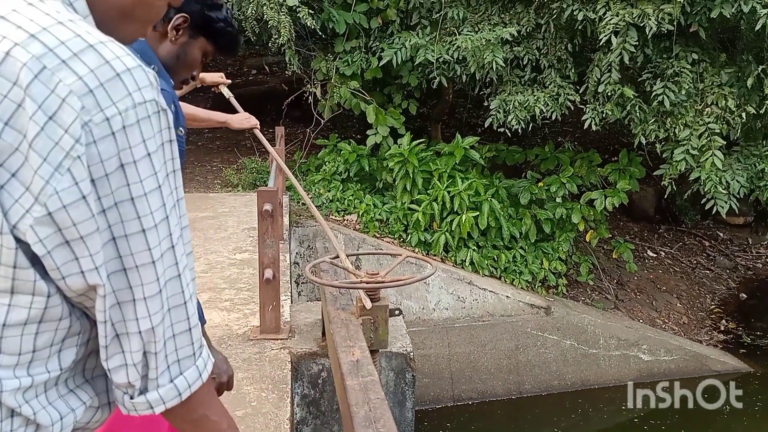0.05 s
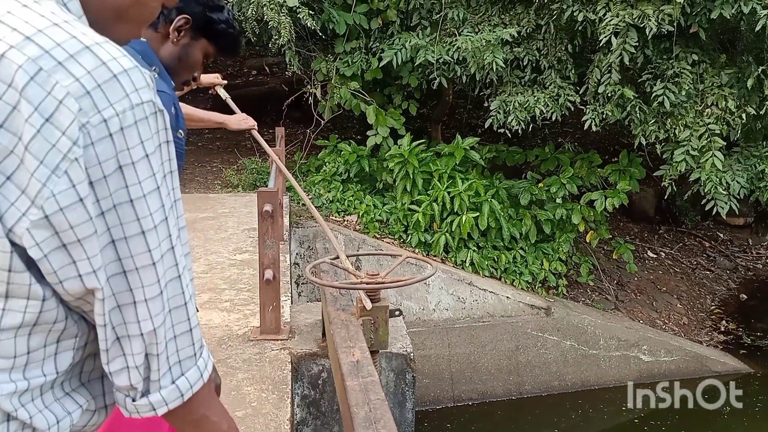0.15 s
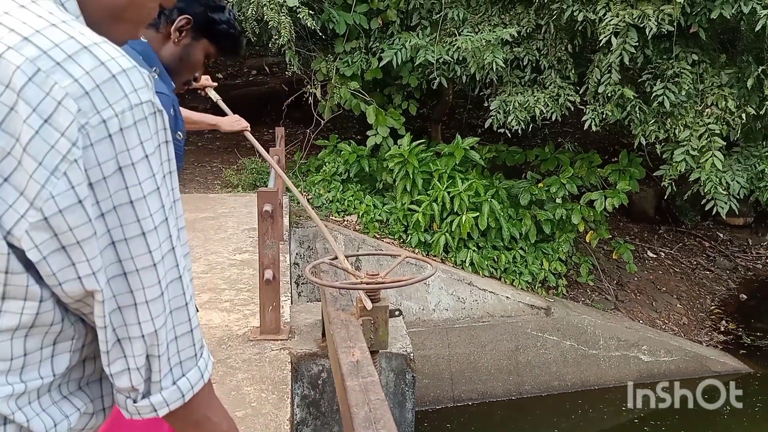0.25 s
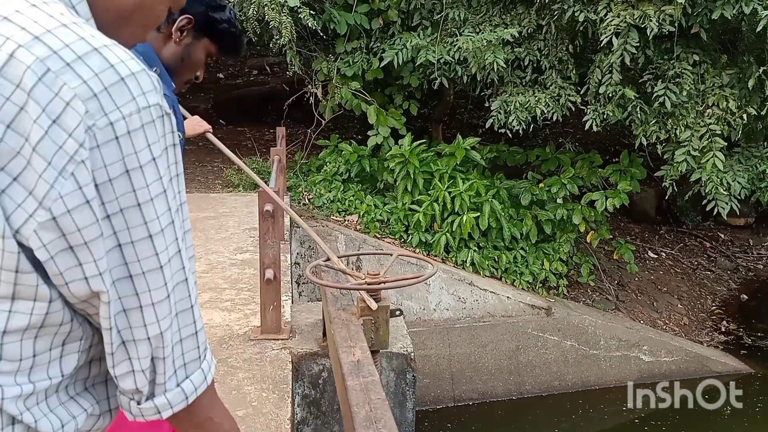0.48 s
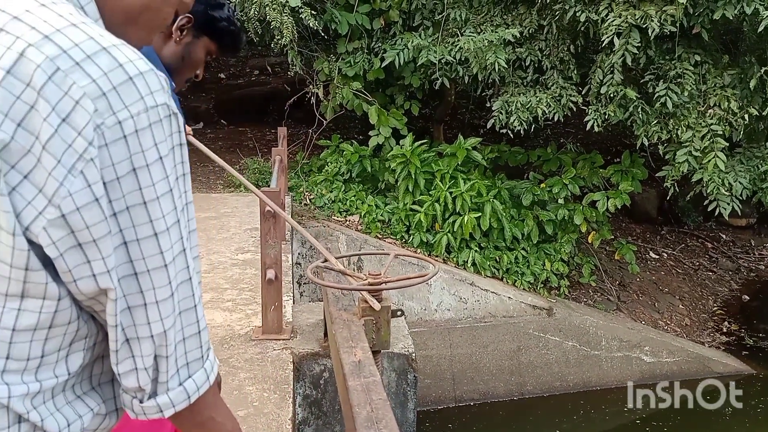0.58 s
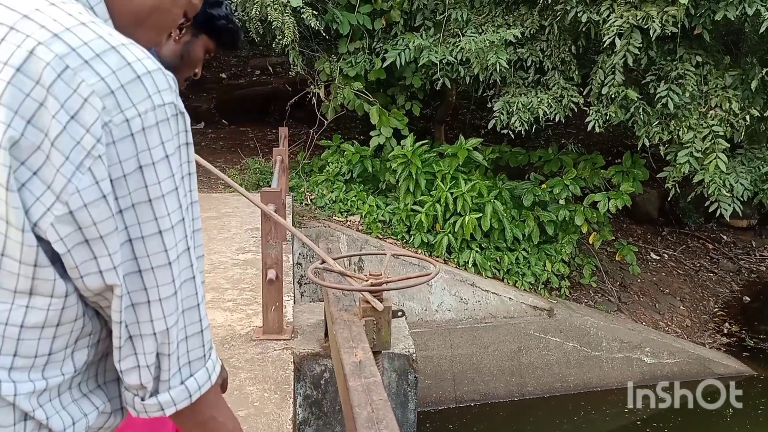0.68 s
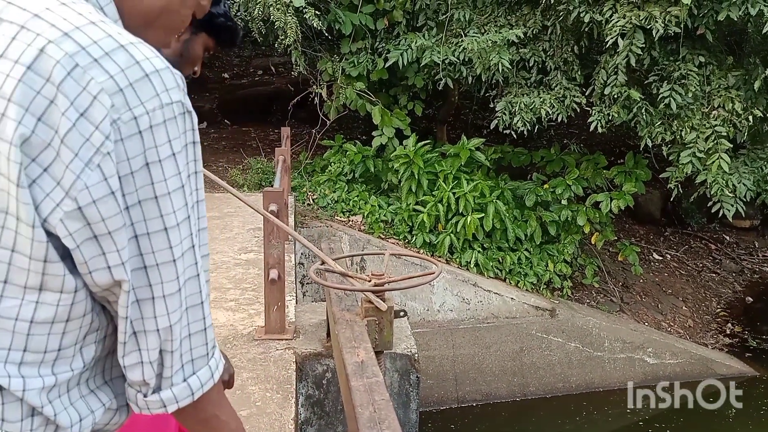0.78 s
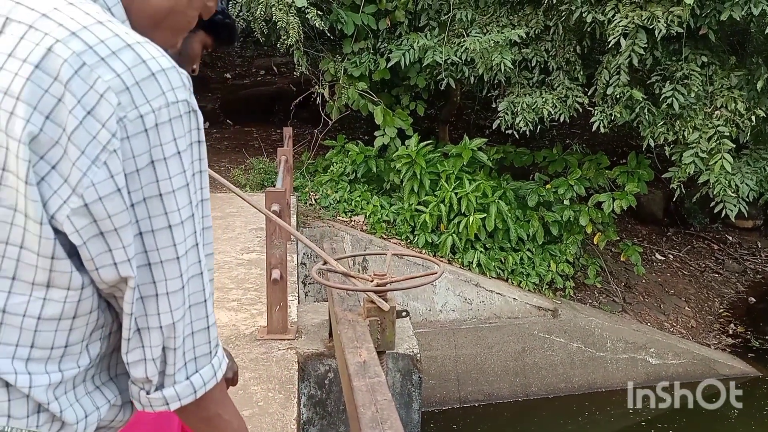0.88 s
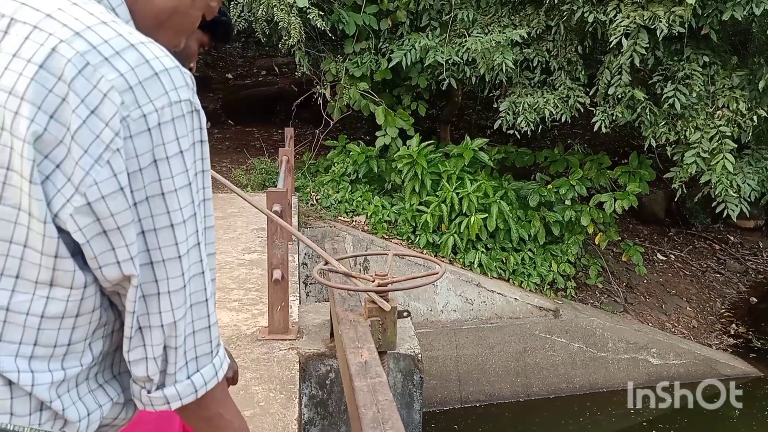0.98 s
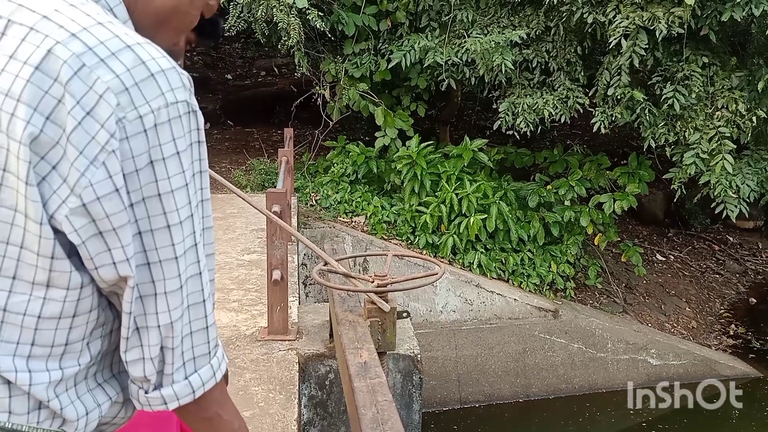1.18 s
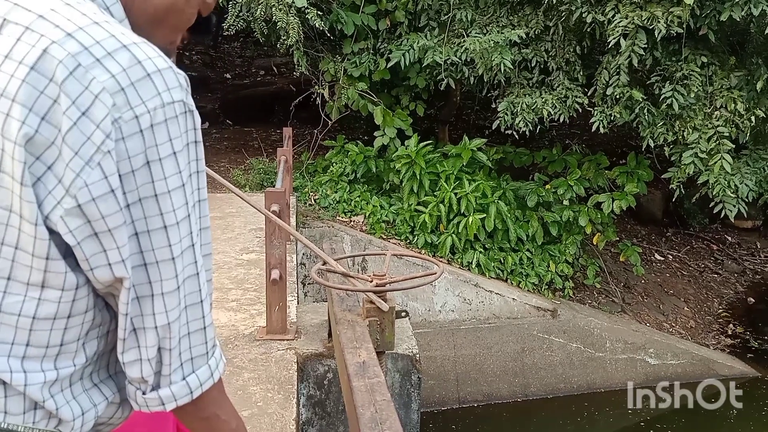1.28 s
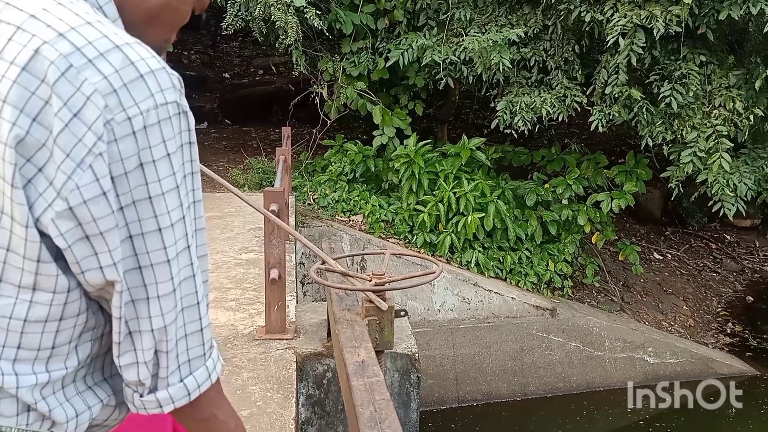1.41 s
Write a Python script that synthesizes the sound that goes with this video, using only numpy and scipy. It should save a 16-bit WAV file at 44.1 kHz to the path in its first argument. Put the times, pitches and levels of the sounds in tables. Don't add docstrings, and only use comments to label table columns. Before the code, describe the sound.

A rusty iron handwheel is forced round with a bar, knocking, creaking and ringing in jolts outdoors

```python
import sys
import numpy as np
from scipy import signal
from scipy.fft import rfft, irfft, next_fast_len
from scipy.io import wavfile
from scipy.ndimage import uniform_filter1d, map_coordinates

SR = 44100
rng = np.random.default_rng(int(sys.argv[2]) if len(sys.argv) > 2 else 0)


def gain_from_db(level_db):
    decades = np.asarray(level_db, float) / 20
    return 10 ** decades


def materialize(psi):
    bounded = np.clip(np.atleast_2d(psi).T, -1, 1)
    quanta = np.round(bounded * 32767).astype(np.int16)
    wavfile.write(sys.argv[1], SR, quanta)


N = 63945


def unit(x):
    return x / np.sqrt(np.mean(x ** 2) + 1e-20)


def along(points, hz):
    point_hz, value = np.transpose(points)
    return np.interp(np.log(hz + 1), np.log(point_hz + 1), value)


def wobble(rate_hz):
    knots = rng.standard_normal(int(N * rate_hz / SR) + 4)
    return map_coordinates(knots, [np.arange(N) * rate_hz / SR])


def filtered(x, response):
    size = next_fast_len(x.shape[-1] + SR // 2)
    spectrum = rfft(x, size) * response(np.fft.rfftfreq(size, 1 / SR))
    return irfft(spectrum, size)[..., :x.shape[-1]]


def band(low_hz, high_hz):
    def response(f):
        high_pass = (1j * f / low_hz / (1 + 1j * f / low_hz)) ** 4
        return high_pass / (1 - (f / high_hz) ** 2 + 1.2j * f / high_hz) ** 3
    return response


def shares(alike, hz):
    turn = np.arccos(np.clip(along(alike, hz), -1, 1)) / 2
    return np.array([np.cos(turn), np.sin(turn)])


def left_right(pair):
    mid, side = pair
    return np.array([mid + side, mid - side])


def add_at(out, start_s, sound):
    out[:, round(start_s * SR):][:, :sound.shape[1]] += sound


# (pitch_hz, level_db per Hz)
HISS_COLOUR = [(40, 1), (130, -4), (350, -12), (1200, -6.5), (4000, -18), (6600, -9), (7900, -29),
               (15300, -41)]
# (pitch_hz, likeness 0-1)
HISS_LIKENESS = [(100, 0.82), (1000, 0.28), (3000, 0.059), (8000, 0.1)]


def hiss():
    hiss_db, trickle_db = -70.5, -73.5
    trickle_hz, trickle_width_hz = 2540, 700
    wide, trickle = rng.standard_normal((2, 2, N))
    wide = unit(filtered(wide, lambda hz: gain_from_db(along(HISS_COLOUR, hz)) * shares(HISS_LIKENESS, hz)))
    lump = lambda hz: np.exp(-((hz - trickle_hz) / trickle_width_hz) ** 2)
    trickle = unit(filtered(trickle, lambda hz: lump(hz) * shares(HISS_LIKENESS, hz)))
    wide = wide * gain_from_db(hiss_db + 1.1 * wobble(18))
    trickle = trickle * gain_from_db(trickle_db + 1.1 * wobble(14))
    return left_right(wide + trickle)


# (pitch_hz, level_db, fade_s to -60 dB)
BEAM_TONES = [(144.6, 2, 0.63), (180.8, -7.5, 0.51), (230.6, -5, 0.34), (285, -5.5, 0.3),
              (326.9, -10.5, 0.27), (388, -6, 0.28)]
# (start_s, upper_hum_db, lower_hum_db)
PUSHES = [(-.3, -37, -54), (0.238, -40, -41), (.3, -42.5, -48), (.37, -45, -54), (0.481, -42.5, -46),
          (0.529, -40.5, -38), (.575, -37, -42), (0.62, -47, -32), (.66, -37, -45), (0.71, -34.5, -40),
          (.79, -48.5, -43), (.85, -44, -47), (1.03, -56, -66)]


def beam():
    rise_s, grip_s = .028, .022
    unsteady_db = 2
    t, out = np.arange(N) / SR, np.zeros(N)
    ends = [row[0] for row in PUSHES[1:]] + [N]
    for (start_s, upper_db, lower_db), end_s in zip(PUSHES, ends):
        since = np.maximum(t - start_s, 0)
        gripped = np.exp(-np.maximum(t - end_s, 0) / grip_s)
        shape = (1 - np.exp(-since / rise_s)) ** 2 * gripped
        tones = [(hz, db + upper_db, fade_s) for hz, db, fade_s in BEAM_TONES]
        tones.append((92.4, lower_db, 0.5))
        tones.append((50, lower_db - 15, .3))
        for hz, db, fade_s in tones:
            level = gain_from_db(db - 60 * since / fade_s + unsteady_db * wobble(14.96))
            out += shape * level * np.sin(2 * np.pi * hz * since + rng.uniform(0, 2 * np.pi))
    return out


# (start_s, length_s, pitch_hz, level_db)
HOOT_CALLS = [(0.032, 0.022, 2490, -59.5), (0.175, 0.059, 870, -67.5), (0.346, 0.022, 1180, -56.5),
              (0.374, 0.021, 1144, -70.5), (0.445, 0.06, 1195, -63), (0.934, 0.02, 1170, -64),
              (0.963, 0.022, 1170, -57), (1.018, 0.02, 1150, -55), (1.036, 0.022, 1250, -57),
              (1.051, 0.024, 1190, -56.5), (1.08, 0.023, 1190, -69), (1.173, 0.015, 1150, -54),
              (1.267, 0.058, 1210, -63.5), (1.319, 0.016, 1180, -64), (1.335, .018, 1210, -68),
              (1.372, .02, 1240, -74), (1.393, 0.038, 1190, -64.5), (1.429, 0.019, 1210, -57.5)]


def bird():
    edge_s, waver_hz, left_db = 0.0057, 25.7, 5.5
    t, out = np.arange(N) / SR, np.zeros(N)
    waver = 2 * np.pi * np.cumsum(waver_hz * wobble(60)) / SR
    for start_s, length_s, hz, db in HOOT_CALLS:
        shape = np.clip(np.minimum(t - start_s, start_s + length_s - t) / edge_s, 0, 1)
        out += gain_from_db(db - 2.5) * shape * np.sin(2 * np.pi * hz * t + waver)
    return out * gain_from_db(2.5 * wobble(90)) * gain_from_db([[left_db], [-left_db]])


# (start_s, pitch_hz, level_db, fade_s to -60 dB)
RUST_TEETH = [(0.2335, 1270, -47, 0.033), (.245, 929.4, -44.5, 0.38), (.25, 532, -39, 0.13),
              (.266, 1145, -33.5, 0.064), (0.284, 323, -43.5, 0.18), (.258, 800, -41.5, .1),
              (.29, 1156, -54.5, 0.29), (0.481, 1524, -38, 0.083), (.483, 968, -36, 0.069),
              (.494, 616, -37.5, 0.092), (0.488, 2620, -46.5, 0.2), (.489, 541.4, -38, 0.29),
              (.503, 2290, -41.5, 0.27), (.512, 1123, -35.5, 0.13), (.537, 1433, -33, 0.039),
              (.546, 2340, -39, 0.053), (.548, 724, -34, 0.21), (0.551, 943, -34.5, .07),
              (.568, 2290, -42, 0.16), (0.591, 1550, -35, 0.09), (.599, 880, -49.5, 0.053),
              (.604, 956, -29.5, 0.053), (0.61, 1305, -39.5, 0.18), (0.6598, 2540, -26, 0.074),
              (0.666, 881, -39, 0.065), (0.681, 2395, -33, 0.13), (0.657, 2850, -31.5, 0.062),
              (0.7068, 3033, -30, 0.022), (0.7081, 1827, -28, 0.023), (0.7151, 940.5, -30.5, 0.16),
              (.726, 910, -30, 0.074), (.73, 935, -35.5, 0.35), (.716, 525, -40, 0.26),
              (0.81, 2516, -28.5, 0.078), (.815, 6230, -32, 0.012), (.826, 2120, -32.5, 0.053),
              (.826, 6500, -33, 0.021), (0.83, 2390, -39, 0.12), (1.169, 1520, -50.5, .08)]


def knocks():
    rise_cycles, rasp_db = 0.56, 2.2
    out, t = np.zeros((2, N + SR)), np.arange(SR // 4) / SR
    for start_s, hz, db, fade_s in RUST_TEETH:
        rise = 1 - np.exp(-t * hz / rise_cycles)
        ring = rise * np.sin(2 * np.pi * hz * t + rng.uniform(0, 2 * np.pi, (2, 1)))
        rasp = map_coordinates(rng.standard_normal(60), [t * 180]) * np.minimum(t / .008, 1)
        add_at(out, start_s, gain_from_db(db - 60 * t / fade_s + rasp_db * rasp) * ring)
    return out[:, :N]


def struck(modes, blur, centre_hz):
    swell_cycles, swell_s = 4, .001
    reach_octaves, shiver_hz = 1.0, 8
    grit_db = 3
    low_hz, high_hz, blur_db, blur_fade_s = blur
    t = np.arange(SR // 3) / SR
    hz, db, fade_s = np.transpose(modes)[:, :, None]

    def swell(f):
        return (1 - np.exp(-t / (swell_s + swell_cycles / f))) ** 2

    def peak(x):
        return x / np.sqrt(uniform_filter1d(x[0] ** 2, size=400).max())

    db = db - 6 * (np.log2(hz / centre_hz) / reach_octaves) ** 2 - 60 * t / fade_s
    drift = np.cumsum(rng.standard_normal((len(hz), len(t))), 1)
    drift = drift * np.sqrt(2 * np.pi * shiver_hz / SR) * hz / 1000
    phase = 2 * np.pi * hz * t + uniform_filter1d(drift, size=60)
    phase = phase + rng.uniform(0, 2 * np.pi, (2, len(hz), 1))
    chance = gain_from_db(rng.normal(0, 1.6, (2, len(hz), 1)))
    rings = (chance * gain_from_db(db) * swell(hz) * np.sin(phase)).sum(1)
    grains_db = grit_db * uniform_filter1d(rng.standard_normal(len(t)), size=25) * 5
    grit = rng.standard_normal((2, len(t))) * gain_from_db(grains_db - 60 * t / blur_fade_s)
    near = lambda f: band(low_hz, high_hz)(f) * band(centre_hz / 3.5, centre_hz * 3.5)(f)
    dense = filtered(grit * swell(centre_hz), near)
    return peak(peak(rings) + gain_from_db(blur_db) * peak(dense))


# (start_s, wheel_db, wheel_centre_hz, bar_db, rust_crack_db)
SLIPS = [(.234, -37, 524, -54, -69.5), (.257, -49, 850, -56.5, -95), (0.4815, -37.5, 885, -45.5, -78.5),
         (0.537, -33.5, 875, -46.5, -66), (0.593, -31.5, 940, -42.5, -66.5), (0.655, -36, 1060, -39, -45.5),
         (0.7064, -35, 1424, -33, -57), (0.72, -34, 860, -56.5, -59.5), (0.806, -40.5, 1070, -34, -47.5),
         (0.907, -61, 1050, -63, -65), (1.024, -65, 1280, -95, -64.5), (1.157, -67.5, 1560, -57, -92)]
# (pitch_hz, level_db, fade_s to -60 dB)
WHEEL_TONES = [(311, 12, 0.11), (331.4, 5.5, 0.45), (402, -0.5, 0.21), (519.4, 0.5, 0.35),
               (685.5, -3.5, 0.21), (724, -8, 0.36), (824, -2.5, 0.12), (925.4, 1, 0.38),
               (1121.5, -5.5, 0.39), (1275, -7.5, 0.28), (1312, -1, 0.35), (1436, -7.5, 0.3),
               (1523, 0, 0.4), (1698, 0.5, 0.27)]
# (pitch_hz, level_db, fade_s to -60 dB)
BAR_TONES = [(2093, -3, 0.53), (2290, -0.5, .25), (2338, -5, 0.54), (2490, -0.5, 0.26), (2565, -1, 0.3),
             (2927, 1.5, 0.3), (3250, 1.5, 0.092)]
# (pitch_hz, level_db, fade_s to -60 dB)
RUST_TONES = [(5530, -4.5, .025), (5730, 24, 0.075), (6660, 22, 0.32), (7880, 2.5, 0.29),
              (7690, -21, 0.042)]


def jolts():
    contact_s, let_go_s, let_go_db = .024, .006, -4.5
    regrip_db = -3
    # (low_hz, high_hz, level_db over the rings, fade_s)
    wheel_blur, bar_blur = (178, 1496, -0.5, 0.44), (2001, 2693.5, -6, .22)
    rust_blur = (2900, 5600, 1.4, 0.39)
    out, t = np.zeros((2, N + SR)), np.arange(SR // 3) / SR

    def step(at_s, width_s):
        return .5 + .5 * np.tanh((t - at_s) / width_s)

    nexts = [row[0] for row in SLIPS[1:]] + [N]
    for (start_s, wheel_db, centre_hz, bar_db, rust_db), next_s in zip(SLIPS, nexts):
        iron = gain_from_db(wheel_db) * struck(WHEEL_TONES, wheel_blur, centre_hz)
        iron += gain_from_db(bar_db) * struck(BAR_TONES, bar_blur, 1940)
        iron += gain_from_db(rust_db) * struck(RUST_TONES, rust_blur, 12100)
        damping_db = let_go_db * step(contact_s, let_go_s)
        damping_db += regrip_db * step(next_s - start_s - .004, 0.00089)
        add_at(out, start_s, iron * gain_from_db(damping_db))
    return out[:, :N]


# (start_s, level_db, fade_s to -60 dB, lowest_hz)
IRON_SPARKS = [
    (0.596, -65.5, 0.026, 5860),
    (.6565, -64, 0.021, 5380),
    (0.664, -73, 0.016, 5500),
    (.8065, -54.5, 0.023, 8100),
    (0.8154, -46.5, 0.022, 8000),
    (0.822, -59, .03, 9000),
    (.822, -66.5, 0.65, 8000),
    (0.671, -69.5, 0.17, 5200),
    (0.9055, -63, 0.024, 4480),
]


def sparks():
    out, t = np.zeros((2, N + SR)), np.arange(SR // 4) / SR
    for start_s, db, fade_s, low_hz in IRON_SPARKS:
        spark = unit(filtered(rng.standard_normal((2, len(t))), band(low_hz, 12100)))
        ending = np.cos(2 * np.pi * t)
        add_at(out, start_s, gain_from_db(db - 60 * t / fade_s) * ending * spark)
    return out[:, :N]


# (time_s, level_db)
DRAG_STRENGTH = [
    (0.877, -32),
    (0.957, -58),
    (1.009, -55.5),
    (1.04, -52),
    (1.098, -49.5),
    (1.179, -54.5),
    (1.216, -59),
    (1.27, -67),
]
# (pitch_hz, level_db per Hz)
SCRAPE_COLOUR = [(150, -3.5), (400, -4.5), (1500, -4), (3300, 1), (4300, -12), (6300, 0.5), (8000, -21.5),
                 (15300, -35)]


def drag():
    time_s, db = np.transpose(DRAG_STRENGTH)
    t = np.arange(N) / SR
    grit = rng.standard_normal((2, N)) * gain_from_db(0.83 * wobble(450) + 1.4 * wobble(60.1))
    scrape = unit(filtered(grit, lambda hz: gain_from_db(along(SCRAPE_COLOUR, hz))))
    fade = np.clip((t - time_s[0]) / 0.085, 0, 1) * np.clip((time_s[-1] - t) / 0.055, 0, 1)
    return gain_from_db(np.interp(t, time_s, db) - 4.3) * fade * scrape


def bank(x):
    t = np.arange(SR // 2) / SR
    tail = rng.standard_normal((2, len(t))) * gain_from_db(-60 * t / .4) * (t > .012)
    return signal.fftconvolve(x[None], tail / np.linalg.norm(tail[0]), axes=1)[:, :N]


# (pitch_hz, likeness 0-1)
IRON_LIKENESS = [(200, 0.99), (700, 0.9), (1500, 0.65), (3000, 0.58), (5500, 0.15), (10000, 0.75)]
# (pitch_hz, level_db the left gains and the right loses)
LEFT_LEAN = [(150, 0.2), (700, 0), (3000, 2.87), (9000, -0.1)]


def to_the_left(pair):
    lag_s = .00006
    near = left_right(filtered(pair, lambda hz: shares(IRON_LIKENESS, hz)))

    def lean(hz):
        delay = np.exp(np.outer([-1j, 1j], np.pi * hz * lag_s))
        return delay * gain_from_db(np.outer([1, -1], along(LEFT_LEAN, hz)))

    return filtered(near, lean)


def scene():
    iron = knocks() + jolts() + sparks() + drag()
    near = to_the_left(iron + beam() * [[1], [.5]])
    return near + gain_from_db(-20) * bank(iron[0]) + bird() + hiss()


def low_pass(x):
    return signal.sosfilt(signal.butter(12, 15300, fs=SR, output="sos"), x)


def record(dry):
    low_cut_hz, top_hz = 65, 15300
    heard = filtered(dry, lambda hz: (1j * hz / (low_cut_hz + 1j * hz)) ** 2 * (hz < top_hz))
    return low_pass(heard)


dry = scene()
out = record(dry)
materialize(out)
```